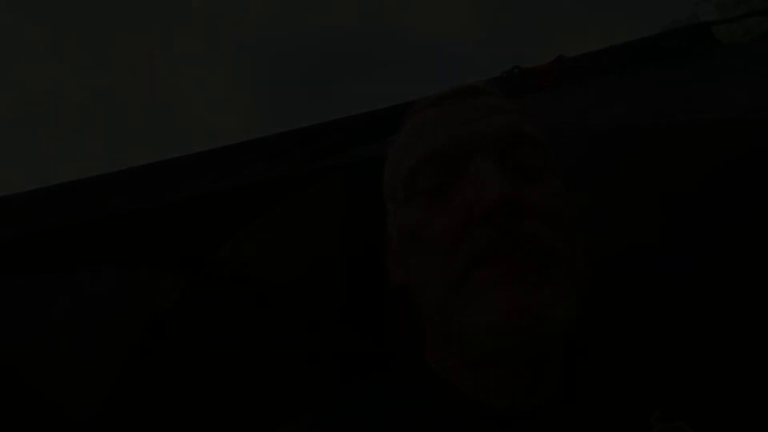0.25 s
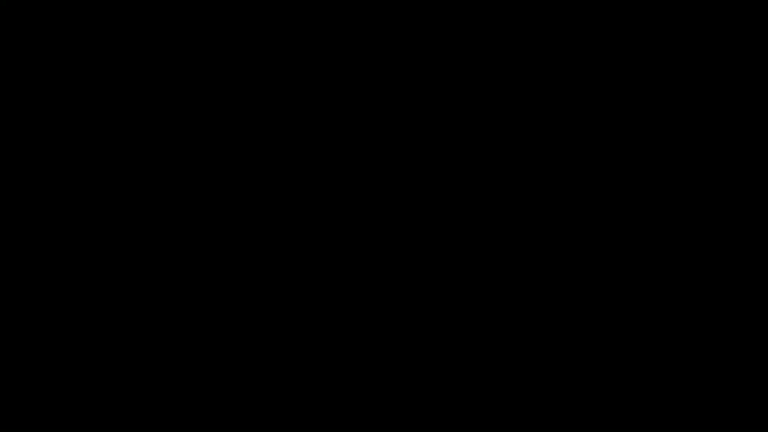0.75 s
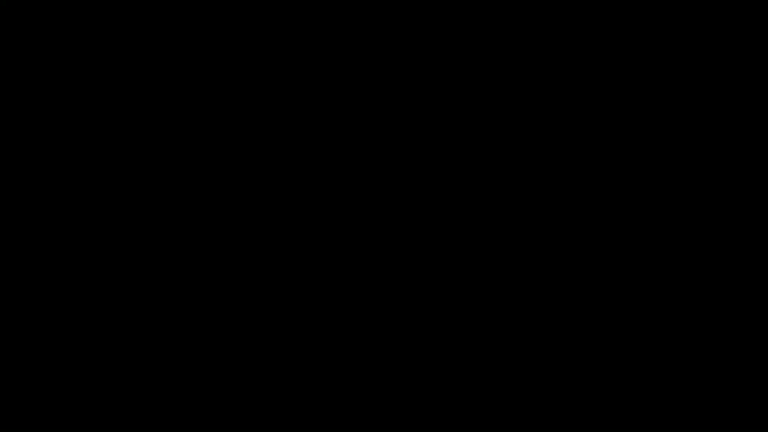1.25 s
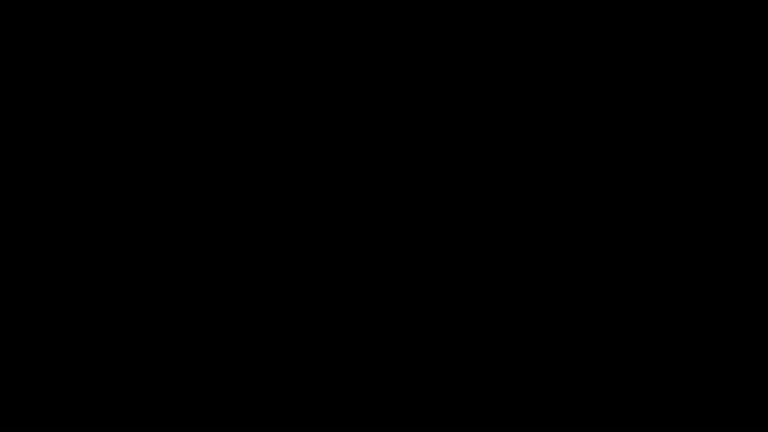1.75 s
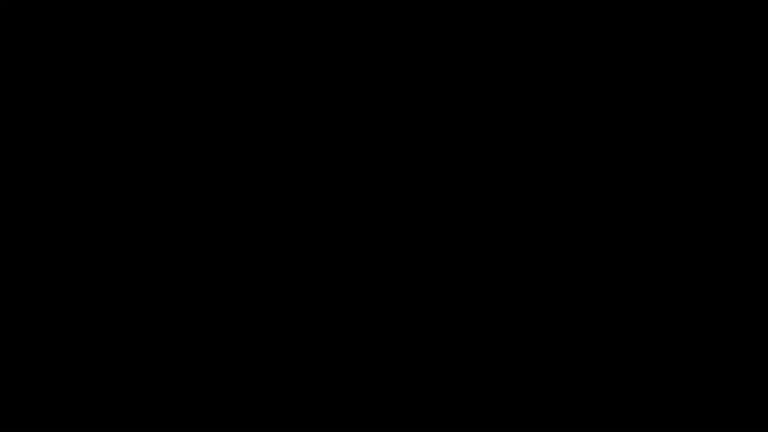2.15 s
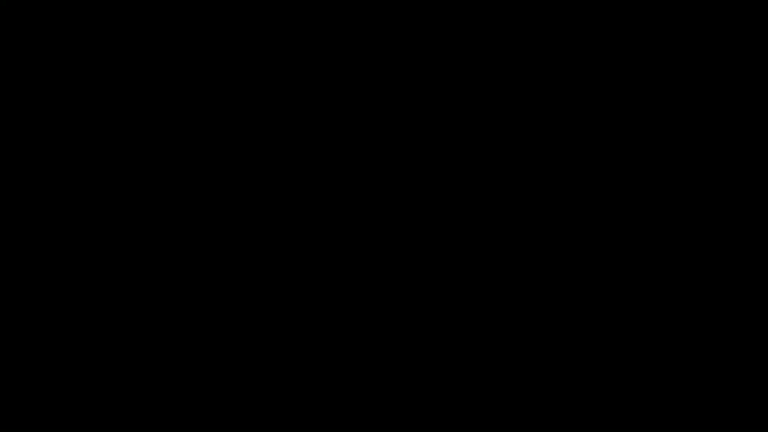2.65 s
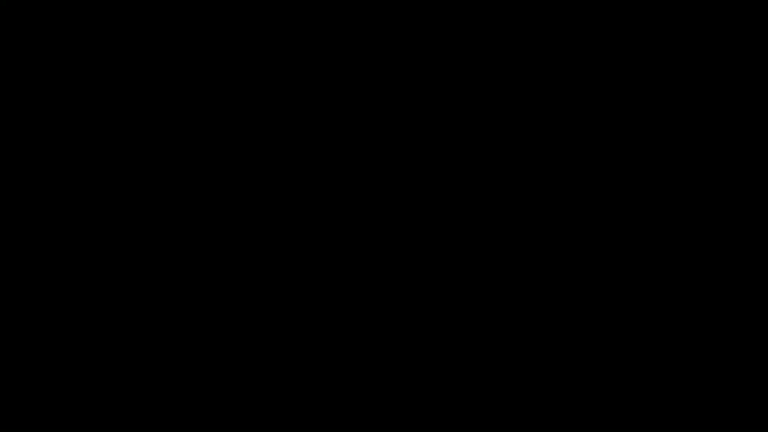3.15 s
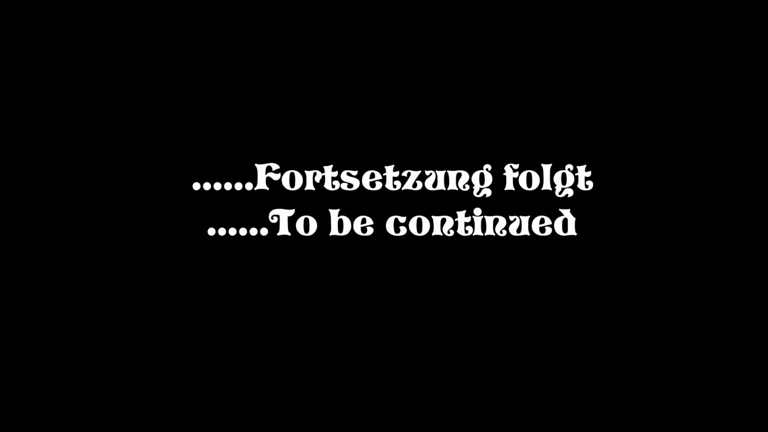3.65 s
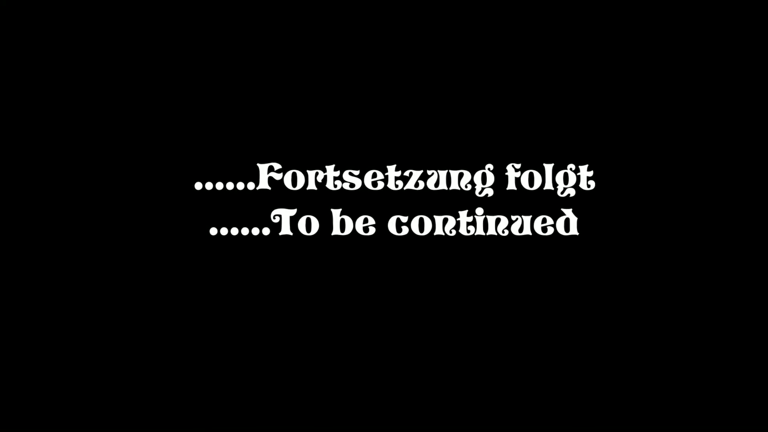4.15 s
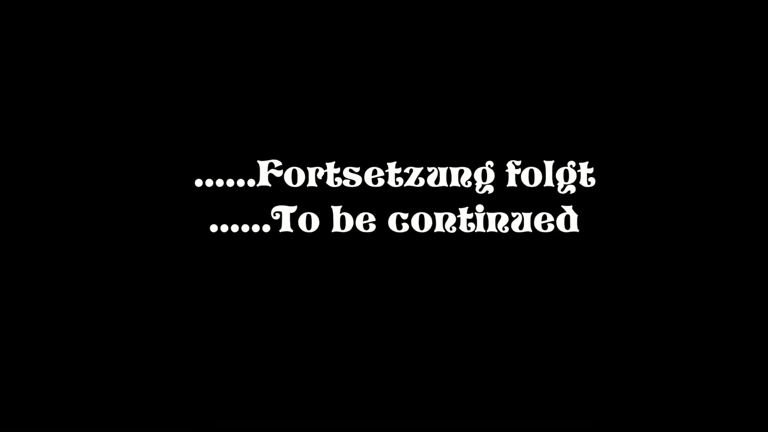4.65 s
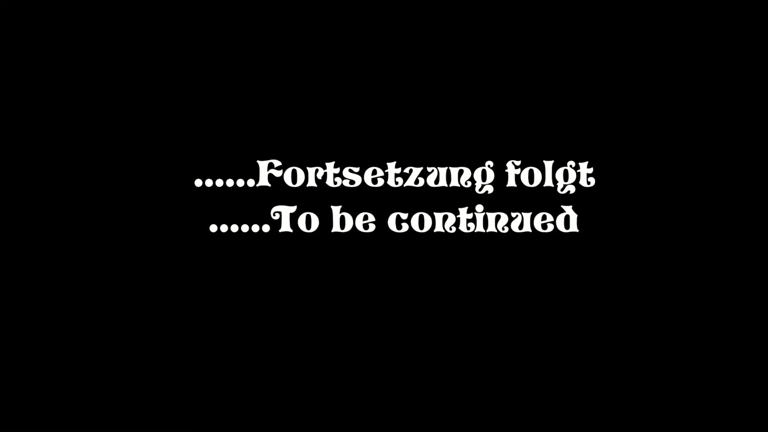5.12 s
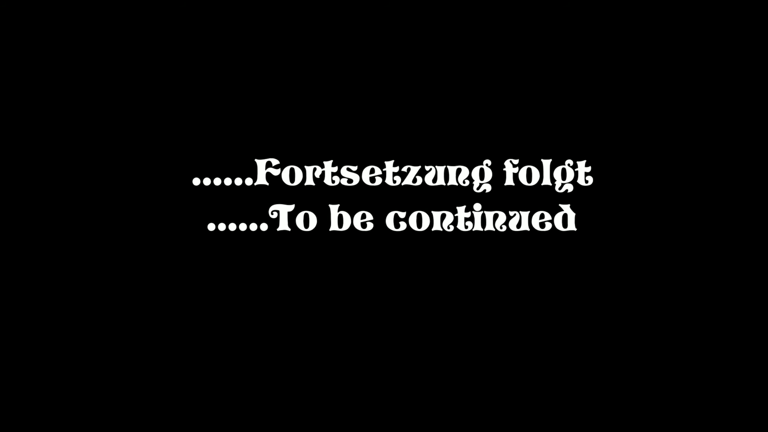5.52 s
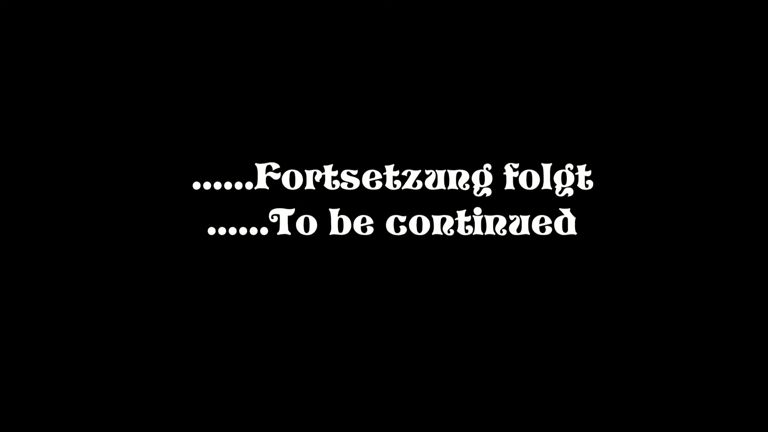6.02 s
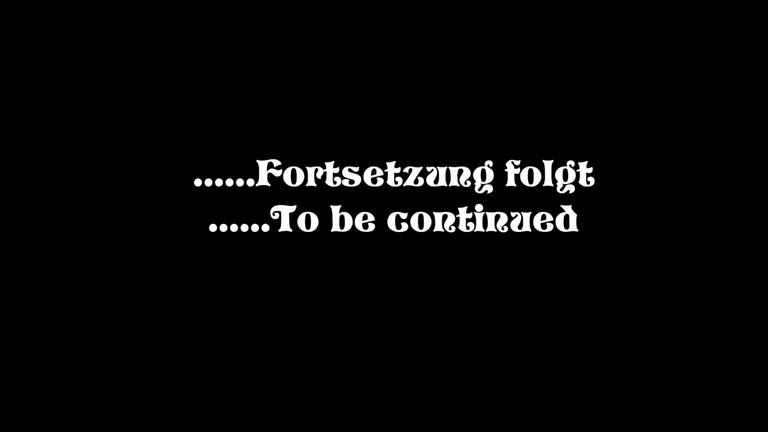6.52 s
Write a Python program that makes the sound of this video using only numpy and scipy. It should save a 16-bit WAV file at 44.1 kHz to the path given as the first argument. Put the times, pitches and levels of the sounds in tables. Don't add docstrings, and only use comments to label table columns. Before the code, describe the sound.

Road rumble, a switch click, a grinding starter that stalls, then a second grind and a big motorcycle engine catches into loud, clanking idle.

```python
import sys
import numpy as np
from scipy import signal
from scipy.fft import rfft, irfft, next_fast_len
from scipy.io import wavfile
from scipy.ndimage import uniform_filter1d

SR = 44100
rng = np.random.default_rng(int(sys.argv[2]) if len(sys.argv) > 2 else 0)


def generate_wav(sig):
    pcm = np.round(np.clip(np.atleast_2d(sig).T, -1, 1) * 32767).astype(np.int16)
    wavfile.write(sys.argv[1], SR, pcm)


def decibels_to_gain(level_db):
    exponent = np.asarray(level_db, float) / 20
    return 10 ** exponent


N = 298998
SIZE = next_fast_len(N, True)
HZ = np.arange(SIZE // 2 + 1) * SR / SIZE + 1e-3
TIME = np.arange(N) / SR
IDLE_CYCLE_S = 0.166

# [firing t/s, clank level/dB, clank ring f/Hz, second stroke level/dB, pipe ring level/dB]
CYCLES = [(3.358, -9.5, 2200, -19.5, -38), (3.5673, -11, 2670, -18, -10), (3.7315, -9.5, 2910, -26.5, -17),
          (3.9139, -12, 2780, -19, -8.5), (4.0778, -8.5, 3880, -20, -11.5), (4.2394, -9.5, 3440, -22, -9),
          (4.4055, -10.5, 3620, -21.5, -11), (4.5623, -11, 2700, -22.5, -24),
          (4.7298, -9.5, 2740, -20.9, -14), (4.899, -9, 3580, -22, -37), (5.0715, -11, 2720, -21.5, -12),
          (5.2349, -10, 2690, -29, -15), (5.4052, -9, 1950, -20.5, -14), (5.5659, -9, 2670, -26, -22),
          (5.7449, -13.5, 2000, -22, -10.5), (5.9016, -10.5, 2070, -31, -16), (6.0715, -12, 2080, -21, -13),
          (6.2329, -9, 1790, -31, -15), (6.3978, -10.5, 3240, -21, -19), (6.5705, -11, 2020, -24, -20),
          (6.7383, -10.5, 2550, -26, -27)]
# [t/s, length/s, level/dB, lowest pitch f/Hz, growth/dB]
CRANKED = [
    (1.7338, 0.11, -25.5, 44, -4),
    (1.866, 0.098, -31, 55.4, -14),
    (2.0192, 0.11, -22.5, 54.7, -3),
    (2.1736, 0.087, -21.5, 57.5, -7),
    (3.062, 0.11, -28.0, 49.5, 0),
]
# [t/s, level/dB]
RUNNING = [(3.3, -29), (4.0, -37.5), (6.78, -40.5)]
# [f/Hz, width/Hz, level/dB]
CASES = [(1700, 1530, -6), (2112, 510, 0), (2650, 514, -7.5), (3037, 690, -1.5), (3620, 510, -4.5),
         (4240, 1000, -7), (5150, 510, -10), (6440, 1080, -8.5)]
# [f/Hz, width/Hz, level/dB]
SIZZLE = [(8570, 16200, 13.5), (12150, 1100, 7.5), (12500, 4500, -30)]
# [f/Hz, level/dB]
METAL = [(180, -13.5), (300, -22.5), (412, -9), (574, 2), (1430, -6.5), (2100, -10.5), (6740, -14),
         (8220, -16), (11700, -21.5), (14700, -30), (16000, -46)]


def over_hz(table):
    hz, value = np.transpose(table)
    return np.interp(np.log(HZ), np.log(np.maximum(hz, 1)), value)


def over_time(table):
    s, *columns = np.transpose(table)
    return [np.interp(TIME, s, column) for column in columns]


def resonances(modes):
    response = 0
    for k, (f, width, db) in enumerate(modes):
        response = response + (-1) ** k * decibels_to_gain(db) * 1j * HZ * width / (f * f - HZ ** 2 + 1j * HZ * width)
    return response


def walk(rate):
    k = int(SR / rate)
    steps = np.repeat(rng.standard_normal(N // k + 1), k)
    return 1.13 * uniform_filter1d(uniform_filter1d(steps, k), k)[:N]


def ports(envelope, response, alike=1):
    # [f/Hz, level/dB]
    balance = [(60, -1.5), (110, 2), (200, 0.5), (380, 1.5), (700, 5), (1290, 2.5), (2380, 6.5), (4400, 9),
               (8120, 1.5), (15000, 2.5)]
    # [f/Hz, lead/rad]
    phase_lead = [(100, 0), (1030, .7), (1550, 2.6), (1850, 0), (3000, 1.1), (5300, 0), (8400, -np.pi),
                  (12000, -2 * np.pi), (15000, -3 * np.pi)]
    # [f/Hz, share/0-1]
    likeness = [(60, .98), (250, .85), (700, .75), (2000, .66), (6000, .62), (15000, .75)]
    noise = rng.standard_normal((2, N))
    scale = np.sqrt(np.mean(np.abs(response) ** 2))
    left, other = rfft(noise * envelope, SIZE)
    share = np.clip(alike * over_hz(likeness), 0, 1)
    right = share * left * np.exp(-1j * over_hz(phase_lead)) + np.sqrt(1 - share ** 2) * other
    tilt = decibels_to_gain(over_hz(balance) / 2)
    return irfft(np.array([left * tilt, right / tilt]) * response / scale, SIZE)[:, :N]


def lean_left(x, db):
    return x * decibels_to_gain(np.array([[db], [-db]]))


def thud(db, first_hz, last_hz, t60):
    t = np.arange(SR // 12) / SR
    hz = last_hz + (first_hz - last_hz) * decibels_to_gain(-60 * t / t60)
    return decibels_to_gain(db - 60 * t / t60) * np.sin(2 * np.pi * np.cumsum(hz) / SR)


def add(out, s, x):
    start = int(s * SR)
    out[start:start + len(x)] += x


def cycles():
    s, clank_db, ring_hz, second_db, pipe_db = np.transpose(CYCLES)
    period = np.diff(s, append=s[-1] + IDLE_CYCLE_S)
    return s, period, s - s[0], clank_db, ring_hz, second_db, pipe_db


def cycle_count():
    return np.interp(TIME, cycles()[0], np.arange(len(CYCLES)))


def strokes(open_share=0.341, second_at=0.406, firing_db=-13.5, fade_db_per_s=-1.33, cranked_swing=0.85):
    rows = [(s, length, db, hz, cranked_swing, growth_db) for s, length, db, hz, growth_db in CRANKED]
    first_stroke, second_stroke = (50.7, 5.6, -3.3), (58, 2.1, 9)  # (lowest Hz, volume swing, growth dB)
    starts, periods, sinces, _, _, seconds_db, _ = cycles()
    before = np.r_[periods[0], periods[:-1]]
    paces = (periods + np.minimum(periods, before)) / 2
    for s, period, since, second_db in zip(starts, paces, sinces, seconds_db):
        speed = (IDLE_CYCLE_S / period) ** 4
        pair = [(0, firing_db + fade_db_per_s * since, first_stroke), (second_at, second_db, second_stroke)]
        for at, db, (hz, swing, growth_db) in pair:
            rows.append((s + at * period, open_share * period, db, hz, swing * speed, growth_db))
    return rows


def exhaust(steepen=0.059, arch_db=-16, blow_db=-12, surge_db=-5, slap_db=-19, seat_db=-1.5, seat_s=0.0011):
    out = np.zeros(N + SR)
    for s, length, db, low_hz, swing, growth_db in strokes():
        u = np.arange(int(length * SR)) / (length * SR)
        squeeze = np.sqrt((1 + swing) / (1 + swing * np.sin(np.pi * u) ** 2))
        phase = 2 * np.pi * np.cumsum(low_hz * squeeze) / SR
        strength = np.sqrt(squeeze) * decibels_to_gain(db + growth_db * (u - 0.5))
        valve = np.clip(u / 0.12, 0, 1) * np.clip((1 - u) / 0.08, 0, 1)
        arch = np.sin(2 * np.pi * np.cumsum(140 + 90 * np.sin(np.pi * u)) / SR)
        wave = -np.cos(phase) + steepen * squeeze * u * np.cos(2 * phase) + decibels_to_gain(arch_db) * arch
        add(out, s, strength * valve * wave)
        end_db = db + growth_db / 2
        add(out, s - 0.007, thud(db + blow_db, 328, 136, 0.1))
        add(out, s + 0.0019, thud(db - growth_db / 2 + surge_db, 152, 87, 0.062))
        add(out, s + length - 0.008, thud(end_db + slap_db, 380, 150, 0.045))
        spike = np.exp(-((np.arange(400) / SR - 0.004) / seat_s) ** 2)
        add(out, s + length - 0.0105, decibels_to_gain(end_db + seat_db) * spike)
    return lean_left(out[:N], 1.0)


def shuttings(shut_at=0.76, cranked_ring_db=-10):
    s, period, *_, pipe_db = cycles()
    cranked = [(t + length, db + cranked_ring_db) for t, length, db, *_ in CRANKED]
    return cranked + list(zip(s + shut_at * period, pipe_db))


def pipe_ring(hz=95, t60=0.46):
    out = np.zeros(N + SR)
    t = np.arange(SR // 4) / SR
    rows = shuttings()
    for (s, db), detune in zip(rows, rng.standard_normal(len(rows))):
        tone = -np.sin(2 * np.pi * hz * (1 + 0.038 * detune) * t)
        add(out, s - 0.004, tone * decibels_to_gain(db - 10.5 - 60 * t / t60))
    return lean_left(out[:N], 1.0)


def knocks(clank_lead_s=0.0068, tick_fade_db_per_s=-4.5, tick_scatter_db=2.5):
    # [t/s, peak level/dB, knock level/dB, sizzle level/dB, ring f/Hz]
    start_hits = [(1.4172, -19, -18.5, -1.5, 3430), (1.5445, -22, -31, -6, 1560),
                  (1.5516, -9, -24, -5, 5450), (1.5626, -9, -18, -27.5, 2370),
                  (1.616, -14.5, -9.5, -14, 1880), (2.113, -17.5, -22, -40, 1770),
                  (2.2595, -16, -21.5, -34, 2730), (2.3229, -35, -4, -22, 1700),
                  (2.335, -16, -17, -24, 2020), (2.36, -33, -22, -30, 1900), (2.8962, -30, -42, 6, 4510),
                  (2.907, -3.5, -50, -35, 1710), (2.9573, -12, -13, -35, 1800)]
    # [t/s, peak level/dB, ring f/Hz]
    second_clanks = [(3.446, -16, 1950), (3.9797, -19.5, 3100), (4.47, -28.5, 2600), (5.4684, -17.5, 2830),
                     (5.8051, -15, 2430), (6.1353, -14.5, 3270), (6.4648, -18, 2420)]
    # [place in cycle/0-1, peak level/dB, knock level/dB, sizzle level/dB, ring f/Hz]
    ticks = [
        (.255, -16.5, -15.5, -44, 2680),
        (0.766, -18, -11, -47, 1720),
        (.85, -20.5, -14.5, -85, 1950),
    ]
    rows = start_hits + [(s, db, -12.5, -8.5, hz) for s, db, hz in second_clanks]
    chance = rng.standard_normal((len(CYCLES), len(ticks)))
    for (s, period, since, clank_db, ring_hz, *_), uneven in zip(zip(*cycles()), chance):
        rows.append((s - clank_lead_s, clank_db, -16.5, -8.5, ring_hz))
        for (at, db, *voice), u in zip(ticks, uneven):
            tick_db = db + tick_fade_db_per_s * since + tick_scatter_db * u
            rows.append((s + at * period, tick_db, *voice))
    return rows


def hits(rise=0.0042, rattle=0.0054, tail_db=-11, tail_t60=0.14, scatter_db=3.5, favour_db=10):
    # [f/Hz, width/Hz, level/dB]
    knock_modes = [(611, 297, 1), (803, 560, -3.5), (929, 122, -3)]
    envelope = np.zeros((len(CASES) + 2, N + SR))
    t = np.arange(SR // 6) / SR
    burst = np.exp(-((t - rise) / np.where(t < rise, 0.61 * rattle, rattle)) ** 2)
    shape = burst + np.minimum(t / rise, 1) * decibels_to_gain(tail_db - 60 * t / tail_t60)
    rows = knocks()
    chance = rng.standard_normal((len(rows), len(CASES)))
    for (s, db, knock_db, sizzle_db, ring_hz), colour in zip(rows, chance):
        near = np.exp(-(np.log(np.array(CASES)[:, 0] / ring_hz) / 0.21) ** 2)
        size = decibels_to_gain(db + np.r_[scatter_db * colour + favour_db * near, knock_db, sizzle_db])
        i = int((s - rise / 2) * SR)
        envelope[:, i:i + len(t)] = np.hypot(envelope[:, i:i + len(t)], size[:, None] * shape)
    envelope = envelope[:, :N]
    cases = sum(decibels_to_gain(mode[2]) * ports(e, resonances([mode]) ** 2) for e, mode in zip(envelope, CASES))
    knock = ports(envelope[-2], resonances(knock_modes))
    sizzle = ports(envelope[-1], resonances(SIZZLE))
    return decibels_to_gain(-22.5) * cases + knock + decibels_to_gain(-4.5) * sizzle


def pings(ping_db=-11.5, t60=0.029):
    out = np.zeros(N + SR)
    for s, db, _, _, ring_hz in knocks():
        add(out, s + 0.002023, thud(db + ping_db, ring_hz, ring_hz, t60))
    return lean_left(out[:N], 3.0)


def tappets(spread=0.038, scatter_db=1.0):
    # [place in cycle/0-1, level/dB]
    places = [(.19, -1.5), (.43, -23), (.755, -2), (.857, -0.5)]
    # [t/s, level/dB]
    loudness = [(3.4, -40.5), (4.4, -33), (4.9, -32.5), (5.5, -36.5), (6.78, -36.5)]
    turns = cycle_count()
    chance = rng.standard_normal((int(turns[-1]) + 1, len(places)))
    taps = 0
    for k, (at, db) in enumerate(places):
        level = decibels_to_gain(db + scatter_db * chance[turns.astype(int), k])
        taps = taps + level * np.exp(-((turns % 1 - at) / spread) ** 2)
    cover = resonances([(1700, 160, 16), (2280, 26, 3.2)]) ** 2
    return ports(taps * decibels_to_gain(over_time(loudness)[0]), cover)


def running_gear(lull_db=-10, lull_at=0.692, lull_width=0.093, sag_db=0.0):
    cycle = cycle_count() % 1
    lull = np.clip(TIME - 3.2, 0, 1) * np.exp(-((cycle - lull_at) / lull_width) ** 2)
    breath_db = sag_db * cycle + lull_db * lull
    gate = np.clip((TIME - 3.33) / 0.03, 0, 1)
    flicker = gate * decibels_to_gain(over_time(RUNNING)[0] + breath_db + 3.2 * walk(60) + 2.6 * walk(300))
    bed = decibels_to_gain(-1.0) * ports(flicker, decibels_to_gain(over_hz(METAL)))
    chain = decibels_to_gain(-9) * ports(flicker * decibels_to_gain(4.0 * walk(70)), resonances(CASES[:4]) ** 2)
    gas = ports(gate * decibels_to_gain(-39 + 4.2 * walk(26)), resonances([(85, 37, -2), (222, 140, -5.5)]))
    return bed + chain + gas


def clatter(grind, count=3000, level_db=-1.5, spread_db=4.5, t60=0.018, starter_db=-1.5):
    when, which, detune, side = rng.random((count, 4)).T
    busy_db = 5 * np.cos(2 * np.pi * (cycle_count() - 0.1)) + 3.3 * walk(40)
    at = (when * N).astype(int)
    idle = (TIME > CYCLES[0][0]) * decibels_to_gain(over_time(RUNNING)[0] + busy_db)
    shake = np.hypot(decibels_to_gain(starter_db) * grind, idle)
    hz, width, db = np.array(CASES)[(which * len(CASES)).astype(int)].T
    size = shake[at] * decibels_to_gain(level_db + db + spread_db * rng.exponential(size=count).clip(0, 2))
    t = np.arange(SR // 70) / SR
    tones = np.sin(2 * np.pi * (hz + width * (detune - 0.5))[:, None] * t)
    rings = size[:, None] * decibels_to_gain(-60 * t / t60) * tones
    spots = (at[:, None] + np.arange(len(t))).ravel()
    gains = np.cos(side), np.sin(1.05 * side)
    return np.array([np.bincount(spots, (rings * g[:, None]).ravel(), N + SR)[:N] for g in gains])


def starter_load(sag_db_per_s=40, coast_s=2.2, coast_growl_db=15.5):
    # [t/s, level/dB]
    spins = [
        [(1.556, -25.5), (1.71, -21.5), (1.86, -30.5), (2.0, -30.5), (2.12, -43), (2.3, -43), (2.4, -33),
         (2.52, -40.5), (2.6, -64.5)],
        [(2.897, -25), (3.06, -26), (3.33, -28.5), (3.36, -44)],
    ]
    spin_voice = (-13, -7, -10)
    # [t/s, length/s, grind level/dB, mesh bite level/dB]
    surges = [(1.563, 0.04, -20.5, -2.5), (1.605, 0.029, -15.5, -9), (1.708, 0.037, -20.5, 3.5),
              (1.762, 0.047, -21, -27.5), (1.894, 0.038, -25, 1), (1.947, 0.035, -25, 0.5),
              (2.152, 0.068, -30, -16.5), (2.319, 0.07, -28, 0), (2.947, 0.064, -22.5, 3.5),
              (3.021, 0.033, -16, -7.5), (3.088, 0.038, -24.5, 6), (3.12, 0.042, -27, 2.5),
              (3.223, 0.04, -22.5, 0), (3.29, 0.051, -20, -6.5)]
    spin = sum((TIME > c[0][0]) * (TIME < c[-1][0]) * decibels_to_gain(over_time(c)[0]) for c in spins)
    power = (spin * decibels_to_gain(np.r_[0, spin_voice])[:, None]) ** 2
    coasting = (TIME > coast_s) * (TIME < spins[0][-1][0])
    power[2] *= decibels_to_gain(2 * coast_growl_db * coasting)
    for s, length, db, bite_db in surges:
        during = slice(int(s * SR), int((s + length) * SR))
        surge = decibels_to_gain(db - sag_db_per_s * (TIME[during] - s))
        voice = np.r_[0, bite_db, -4 - 0.33 * bite_db, -15.5 - 0.7 * bite_db]
        power[:, during] += (surge * decibels_to_gain(voice)[:, None]) ** 2
    grind, *voices = uniform_filter1d(np.sqrt(power), size=400)
    return grind, *(v / (grind + 1e-6) for v in voices)


def starter(grind, whine, growl, sizzle, rough_db=1.0, mesh_hz=815, waver=0.025, mesh_db=-8):
    chatter = grind * decibels_to_gain(rough_db * walk(90) + 2.0 * walk(500))
    gears = decibels_to_gain(-5.5) * ports(chatter, resonances(CASES) + decibels_to_gain(-2.5) * decibels_to_gain(over_hz(METAL)))
    rasp = decibels_to_gain(-10.0) * ports(grind * decibels_to_gain(2.2 * walk(65)), resonances(CASES[:3]) ** 2)
    mesh_modes = resonances([(817, 82, 6.0), (864, 126, -2.0)]) ** 2
    mesh = decibels_to_gain(-5.5) * ports(grind * whine * decibels_to_gain(0.75 * walk(40)), mesh_modes)
    housing = decibels_to_gain(-11.0) * ports(chatter * growl, resonances([(480, 97, -14.0), (594, 200, 1)]))
    teeth = decibels_to_gain(-4.0) * ports(chatter * sizzle, resonances(SIZZLE))
    phase = 2 * np.pi * np.cumsum(mesh_hz * (1 + waver * walk(15))) / SR
    tone = grind * whine * decibels_to_gain(mesh_db) * np.sin(phase)
    return lean_left(tone, 3.0) + gears + rasp + mesh + housing + teeth


def kickback():
    # [t/s, level/dB, first f/Hz, last f/Hz, t60/s]
    kicks = [
        (1.4197, -6, 12500, 10900, 0.0058),
        (1.553, -31, 12000, 10400, 0.0075),
        (1.629, -13, 480, 348, 0.016),
        (1.794, -14.5, 525, 86.5, 0.056),
    ]
    out = np.zeros(N)
    for s, *kick in kicks:
        add(out, s, thud(*kick))
    return lean_left(out, 2.5)


def fuel_pump():
    # [t/s, level/dB]
    whirr = [(2.61, -71), (2.68, -57.5), (2.76, -55), (2.89, -62)]
    # [f/Hz, width/Hz, level/dB]
    body = [(2280, 45, 2), (4010, 35, 3), (4500, 80, -6), (5330, 50, -1)]
    gate = (TIME > whirr[0][0]) * (TIME < whirr[-1][0])
    response = resonances(body) + decibels_to_gain(-3.5) * decibels_to_gain(over_hz(METAL))
    return decibels_to_gain(0.5) * ports(gate * decibels_to_gain(over_time(whirr)[0]), response)


def traffic():
    # [t/s, rumble level/dB, tyre hiss level/dB]
    road = [(0, -32, -40), (.6, -30.5, -39.5), (1.5, -29.5, -39), (1.6, -49.5, -42.5), (2.4, -41, -46.5),
            (2.7, -45.5, -56.5), (3.3, -37.5, -48.5)]
    # [f/Hz, level/dB]
    rumble_colour = [(15, -68), (25, -25), (52, -0.5), (80, 3), (156, -3.5), (259, -15.5), (328, -72),
                     (420, -26.5), (550, -58), (920, -120)]
    # [f/Hz, level/dB]
    tyre_colour = [(180, -12), (300, -1), (647, -8), (735, -6), (1010, -3), (1610, -11), (2540, -24),
                   (3420, -36), (9000, -62.5), (11700, -64), (19800, -120)]
    rumble_db, hiss_db = over_time(road)
    rumble = ports(decibels_to_gain(rumble_db + 0.68 * walk(24.35)), decibels_to_gain(over_hz(rumble_colour)))
    hiss = ports(decibels_to_gain(hiss_db + 1.2 * walk(15)), decibels_to_gain(over_hz(tyre_colour)), alike=0.044)
    swell_db = np.interp(TIME, [0.5, 1.0, 1.5, 1.6], [-57, -37.0, -44, -55.5])
    drone = ports(decibels_to_gain(swell_db), resonances([(257.6, 65, 0.36), (491, 60, -1.4)]) ** 2, alike=0.25)
    floor = decibels_to_gain(-98) * rng.standard_normal((2, N))
    return rumble + hiss + drone + floor


def yard(decay_s=0.0028, rustle_db=-70, rustle_t60=1.2):
    # [t/s, level/dB]
    creaks = [(0.641, -56), (0.673, -57), (0.696, -50), (0.768, -59)]
    # [t/s, length/s, f/Hz, level/dB]
    birds = [
        (0.15, 0.4, 4730, -81.5),
        (0.56, 0.19, 3620, -69),
    ]
    clicks = sum((TIME > s) * decibels_to_gain(db) * np.exp(-(TIME - s).clip(0) / decay_s) for s, db in creaks)
    notes = 0
    for s, length, hz, db in birds:
        swell = np.sin(np.pi * ((TIME - s) / length).clip(0, 1))
        notes = notes + ports(decibels_to_gain(db) * swell, resonances([(hz, 60, 0)]) ** 2)
    rustle_level = decibels_to_gain(rustle_db - 60 * TIME / rustle_t60 + 4.0 * walk(30))
    rustle = ports(rustle_level, resonances([(9000, 9000, 0)]))
    click_modes = resonances([(4500, 800, -2.5), (6200, 1500, -3.5), (11000, 9400, -4.5)]) ** 2
    return rustle + ports(clicks, click_modes) + notes


def scene():
    load = starter_load()
    engine = exhaust() + pipe_ring() + hits() + pings() + tappets() + running_gear() + clatter(load[0])
    return engine + starter(*load) + kickback() + fuel_pump() + traffic() + yard()


def top_cut(x):
    return signal.sosfilt(signal.butter(12, 16500, fs=SR, output="sos"), x)


def record(dry):
    bottom = signal.butter(3, 37, "high", fs=SR, output="sos")
    top = signal.ellip(8, 0.2, 70, 15700, fs=SR, output="sos")
    mix = signal.sosfilt(np.vstack([bottom, top]), dry) - 0.0055
    return top_cut(mix)


dry = scene()
out = record(dry)
generate_wav(out)
```